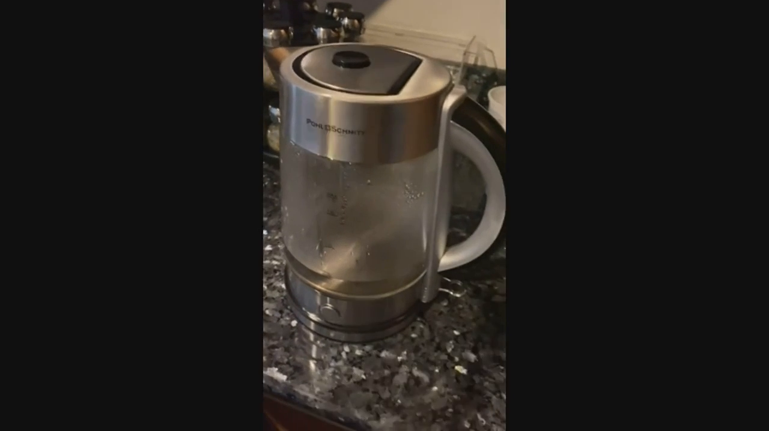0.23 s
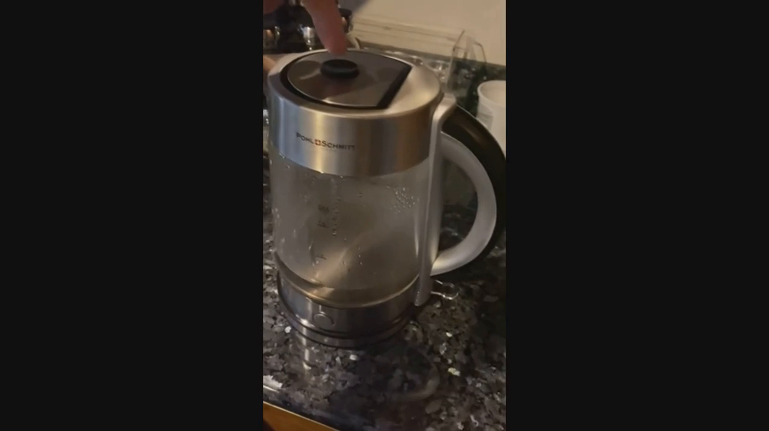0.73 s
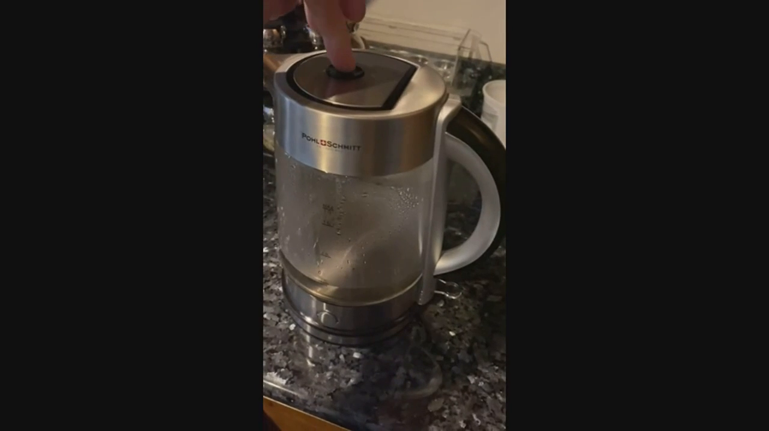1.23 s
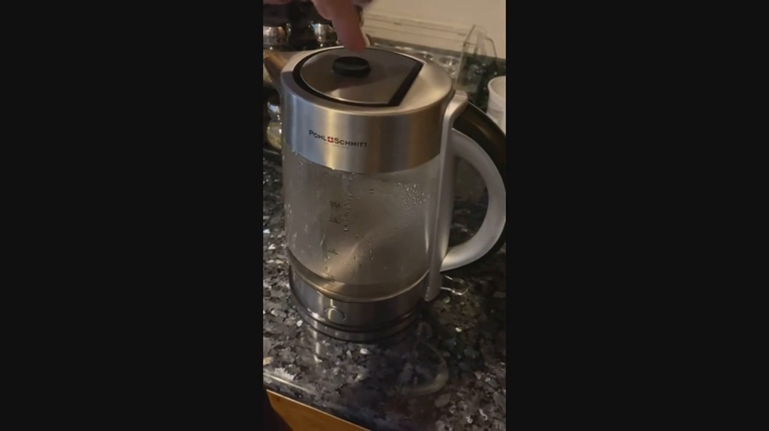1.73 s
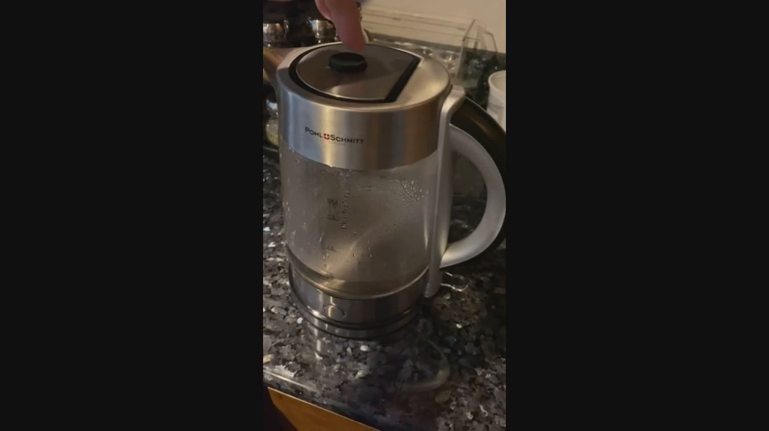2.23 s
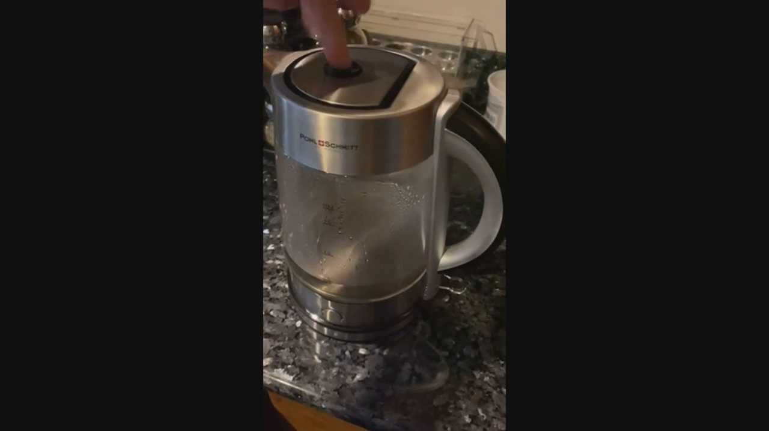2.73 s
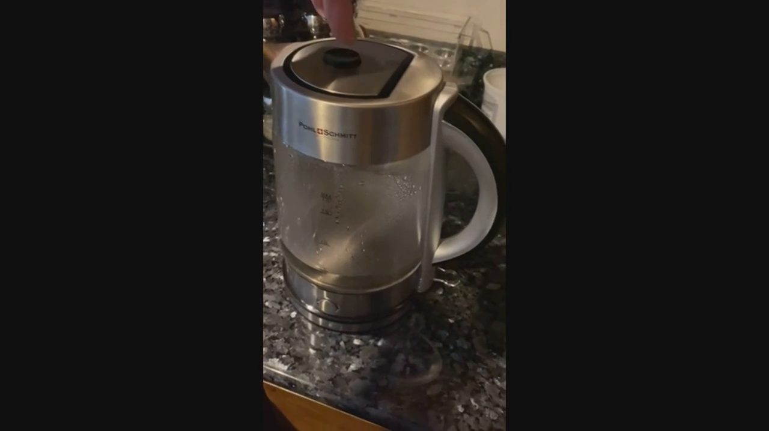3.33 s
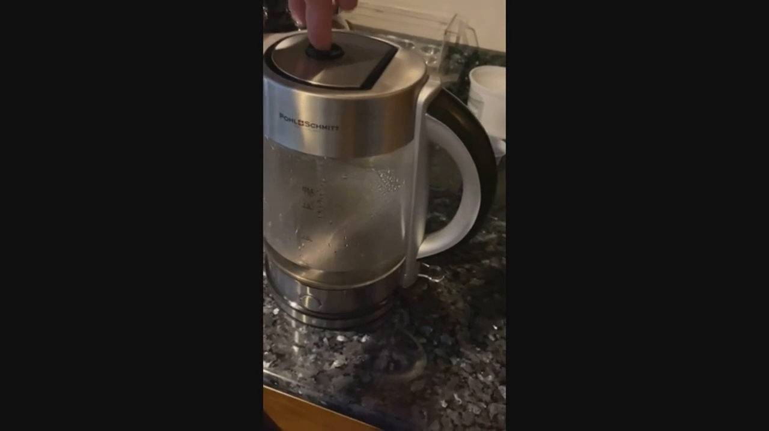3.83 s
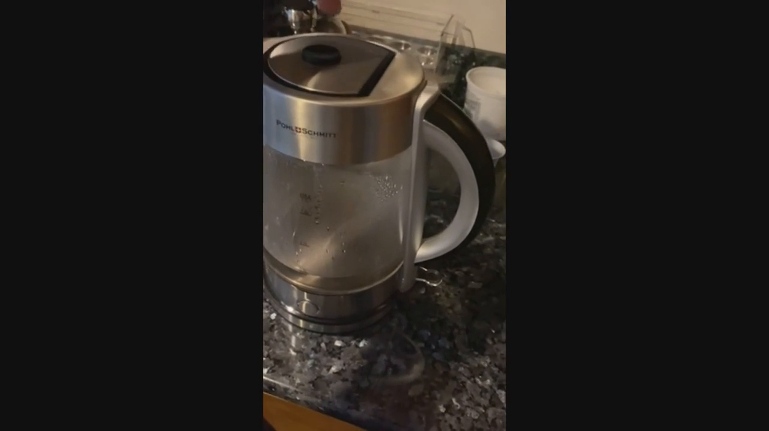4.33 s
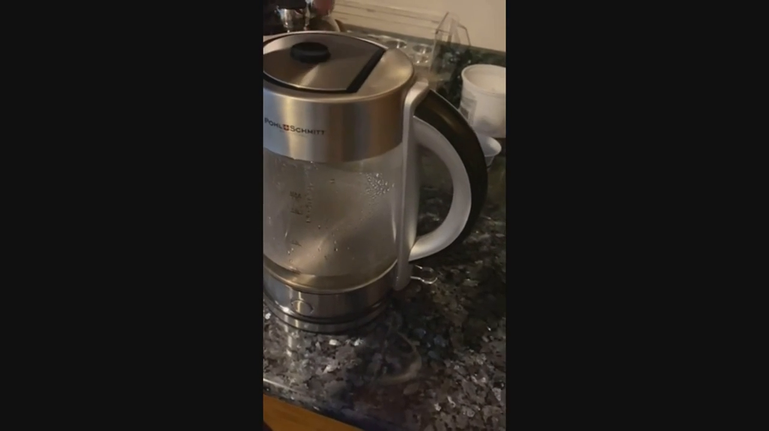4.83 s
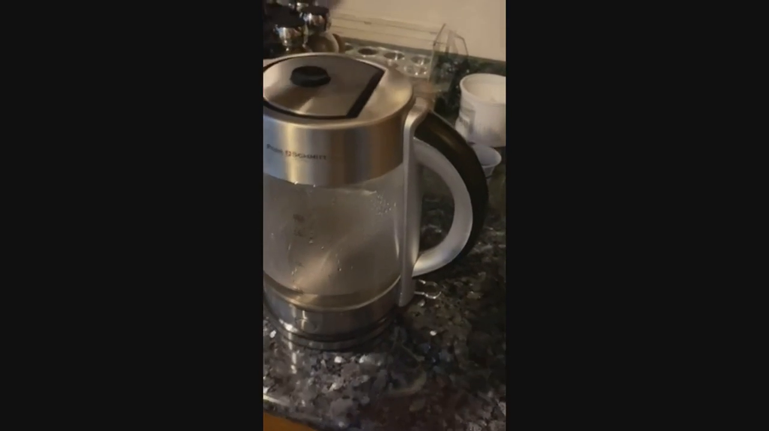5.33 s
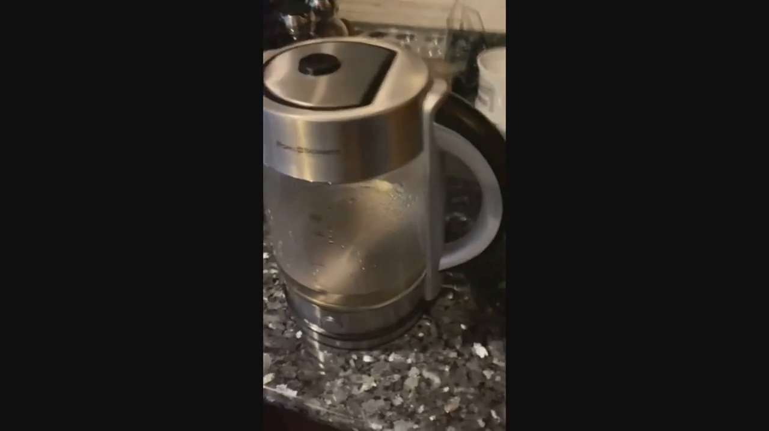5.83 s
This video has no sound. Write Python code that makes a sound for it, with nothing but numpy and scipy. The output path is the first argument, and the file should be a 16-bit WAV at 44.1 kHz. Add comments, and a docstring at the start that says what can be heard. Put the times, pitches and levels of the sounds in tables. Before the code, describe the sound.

A glass electric kettle rumbles low while a finger clicks its lid button four times, then dull thumps bump the microphone.

```python
"""A glass electric kettle rumbles low on a stone counter in a small kitchen, under faint hums and hiss.
Early on, a hand barely brushes the microphone and a fingertip taps the kettle's lid.
The finger then works the lid's button four times: the plastic catch scrapes and snaps, ringing
the lid and rocking the kettle, and the kitchen echoes. Near the end the hand shifts on the
microphone's housing, with a rustle of skin and dull thumps that sag in pitch."""
import sys
import numpy as np
from scipy import signal
from scipy.fft import rfft, irfft
from scipy.io import wavfile
from scipy.ndimage import uniform_filter1d

SR = 44100
rng = np.random.default_rng(int(sys.argv[2]) if len(sys.argv) > 2 else 0)


def waveform_to_disk(signal):
    """Save audio, clipped to [-1, 1], as 16-bit WAV at the path in sys.argv[1]."""
    frames = np.transpose(np.atleast_2d(signal))
    scaled = np.clip(frames, -1, 1) * 32767
    samples = np.round(scaled).astype(np.int16)
    wavfile.write(sys.argv[1], SR, samples)


N = 267642

# how alike the room sounds at the microphone's two ports: (frequency [Hz], likeness [-1 to 1])
ROOM_LIKENESS = [(60, 1), (140, 0.985), (300, 0.95), (640, 0.042), (1400, -0.051), (3100, -0.32)]
# fingers knock on the microphone's housing: (time [s], knock level [dB], skin scuff level [dB])
KNOCKS = [(.534, -57.5, -93), (3.405, -46, -95), (5.622, -41.5, -64.5), (5.829, -43, -56.5),
          (5.876, -46, -75), (5.915, -37, -51), (5.957, -40, -92), (6.0322, -24, -59)]


def amp(db):
    """Decibels to gain."""
    return 10 ** (np.asarray(db) / 20)


def unit_rms(x):
    """Scales to rms 1."""
    return x / np.sqrt(np.mean(x ** 2) + 1e-20)


def unit_energy(x):
    """Scales to energy 1."""
    return x / np.sqrt(np.sum(x ** 2) + 1e-20)


def read(points, hz):
    """Reads a table on a log-frequency axis."""
    f, value = np.transpose(points)
    return np.interp(np.log(hz + 1), np.log(f + 1), value)


def add(mix, s, sound):
    """Mixes a sound in at time s."""
    part = mix[max(round(s * SR), 0):][:len(sound)]
    part += sound[:len(part)]


def equalise(x, gain_db):
    """Minimum-phase EQ; gain_db is a function of frequency."""
    size = 2 * len(x)
    log_gain = np.log(amp(gain_db(abs(np.fft.fftfreq(size, 1 / SR)))))
    response = np.exp(np.conj(signal.hilbert(log_gain)))
    return np.fft.ifft(np.fft.fft(x, size) * response).real[:len(x)]


def noise(spectrum, likeness, patchy_db, size):
    """Stereo noise of rms 1 with patches that drift in time and frequency."""
    hz = np.fft.rfftfreq(size, 1 / SR)
    a, b, c, d, patches = rng.standard_normal((5, 4 * N // size + 5, len(hz)))
    patches = unit_rms(uniform_filter1d(uniform_filter1d(patches, size=7, axis=0), size=16, axis=1))
    like = np.clip(read(likeness, hz), -1, 1)
    left = a + 1j * b
    right = like * left + np.sqrt(1 - like ** 2) * (c + 1j * d)
    frames = np.array([left, right]) * amp(read(spectrum, hz) + patchy_db * patches)
    _, sound = signal.istft(frames.swapaxes(1, 2), nperseg=size, noverlap=size - size // 4)
    return unit_rms(sound[:, :N])


def wander(rate_hz):
    """Smooth random curve of rms 1."""
    hz = np.fft.rfftfreq(N, 1 / SR)
    return unit_rms(irfft(rfft(rng.standard_normal(N)) * np.exp(-(hz / rate_hz) ** 2), N))


def kettle_rumble():
    """The bed: the kettle's rumble and the hums swell together under a steadier wash and a thin hiss."""
    # the rumble's slow rise and fall: (time [s], level before a 1 dB lift [dB])
    swell = [(0.0, -61), (0.62, -57), (0.8, -52.5), (1.57, -51), (2.28, -58), (2.45, -50), (3.52, -56),
             (4.82, -52), (5.47, -54.5), (5.6, -53.5)]
    # spectra of the deep rumble, the midrange wash and the hiss: (frequency [Hz], relative level [dB])
    rumble_spectrum = [(20, -33), (34, -22), (50, -3.5), (64, 2.7), (90, 0), (135, -3.5), (165, -8),
                       (215, -4), (305, -6), (360, -13.5), (580, -25.5), (1500, -65)]
    wash_spectrum = [(150, -22.5), (300, -8.5), (400, 1), (580, -5.5), (1000, -12.5), (1500, -23.5),
                     (3000, -48.5)]
    hiss_spectrum = [(600, -1), (1500, 5), (2400, -1.5), (3400, 1), (4400, -1), (5200, -4), (7000, -7),
                     (11000, -12), (12500, -31), (16000, -38)]
    hiss_likeness = [(1000, -0.35), (8000, 0.086), (15000, -0.67)]  # (frequency [Hz], likeness [-1 to 1])
    swell_db = np.interp(np.arange(N) / SR, *np.transpose(swell))
    level = amp(swell_db + 1 + 0.03 * wander(rate_hz=23))
    low = level * noise(rumble_spectrum, ROOM_LIKENESS, patchy_db=3.0, size=4096)
    wash_level = amp(-66) * unit_rms(level ** 0.29)  # follows only part of the swell
    wash = wash_level * noise(wash_spectrum, ROOM_LIKENESS, patchy_db=1.5, size=1024)
    hiss = amp(-82) * noise(hiss_spectrum, hiss_likeness, patchy_db=3.5, size=1024)
    return low + wash + hiss + hums() * unit_rms(level)


def hums():
    """Two low hums and two faint whines, wavering in strength and phase."""
    # narrow tones: (pitch [Hz], level [dB], width [Hz], lag of the left port [rad])
    tones = [(64.5, -63.5, 11, 0.15), (205, -63, 4.8, 0.13), (2450, -94, 27, 2.27), (10040, -100, 31, 2.3)]
    t, out = np.arange(N) / SR, np.zeros((2, N))
    for hz, db, width_hz, lag in tones:
        waver = wander(width_hz) + 1j * wander(width_hz)
        tone = amp(db) * waver * np.exp(2j * np.pi * hz * t)
        out += np.real([tone * np.exp(-1j * lag), tone])
    return out


def hand_rustle():
    """A sliding hand rustles over the ports and rubs the housing in small jerks; each knock scuffs."""
    # the hand slides on the microphone: (start [s], end [s], rustle level [dB], rub level [dB])
    slides = [(0.085, 0.273, -80, -83), (5.477, 5.534, -79, -90), (5.608, 5.823, -68.5, -72),
              (5.836, 6.05, -67, -53.5)]
    # spectra of skin on the ports and of the rub through the housing: (frequency [Hz], relative level [dB])
    skin_spectrum = [(300, -8), (1100, 8.5), (1550, 6), (2700, 3.5), (4200, 2.5), (5500, 2.5), (6800, -1),
                     (9700, -1.5), (13000, 2), (16000, -10.5)]
    rub_spectrum = [(100, -6.5), (420, 9.5), (570, 4), (770, -0.5), (950, -18), (1500, -51), (4000, -60)]
    # how alike each is at the two ports: (frequency [Hz], likeness [-1 to 1])
    skin_likeness = [(1000, 0.3), (5000, -0.1), (9000, 0.3), (13000, -1.04)]
    rub_likeness = [(200, 0.96), (600, 0.99), (2000, 0.33)]
    attack_s, release_s, scuff_s = 0.0074, 0.032, 0.0013
    t, rustle_level, rub_level = np.arange(N) / SR, np.zeros(N), np.zeros(N)
    for start, end, rustle_db, rub_db in slides:
        moving = np.clip((t - start) / attack_s, 0, 1) * np.exp(-np.maximum(t - end, 0) / release_s)
        rustle_level += amp(rustle_db) * moving
        rub_level += amp(rub_db) * moving
    age = t[:SR // 6] / scuff_s
    for s, _, scuff_db in KNOCKS:
        add(rustle_level, s, amp(scuff_db) * age * np.exp(1 - age))
    rustle = noise(skin_spectrum, skin_likeness, patchy_db=1.2, size=512) * amp(2 * wander(rate_hz=78))
    rub = amp(3.7 * wander(rate_hz=93)) * noise(rub_spectrum, rub_likeness, patchy_db=3.5, size=1024)
    return rustle_level * rustle + rub_level * rub


def sizzle():
    """Faint narrow bands of hiss swell and fade, unrelated at the two ports; one is the button's spring ringing
    on after a press."""
    # swells of hiss, the one at 4.68 s the button's steel spring ringing on after the press: (time [s], level
    # [dB], band centre [Hz])
    swells = [(.48, -85, 4080), (2.6, -80.5, 3890), (3.18, -78.5, 3470), (3.35, -81, 4040),
              (4.14, -80.5, 3610), (4.33, -82.5, 4020), (4.68, -75.5, 4100), (5.36, -87, 3970),
              (5.52, -80.5, 3580)]
    half_length_s, width_hz = 0.097, 570
    t = np.arange(N) / SR
    band = np.array([wander(width_hz) + 1j * wander(width_hz) for port in range(2)])
    carriers = sum(amp(db) * np.exp(-((t - s) / half_length_s) ** 2 + 2j * np.pi * hz * t)
                   for s, db, hz in swells)
    return (band * carriers).real


def thud(db, first_hz, last_hz, swell_s):
    """A soft blow: a few cycles that swell, sag in pitch as the contact relaxes, and die."""
    age = np.arange(SR // 6) / SR / swell_s
    hz = last_hz + (first_hz - last_hz) * np.exp(-age / 0.79)
    envelope = (age * np.exp(1 - age)) ** 1.12
    return amp(db) * envelope * np.sin(2 * np.pi * np.cumsum(hz) / SR)


def housing_bumps():
    """Fingers and palm bump the microphone; its housing flexes, so the left port gets them late."""
    # the palm's thumps: (time [s], level [dB], first pitch [Hz], last pitch [Hz])
    thumps = [(5.631, -27, 95, 48), (5.830, -36, 440, 159), (5.892, -38, 101, 80), (5.918, -21, 235, 53.7),
              (6.044, -35.5, 168, 81)]
    flex_lag = [(60, 0.19), (200, 0.3), (600, 0.64)]  # (frequency [Hz], lag [rad])
    swell_cycles = 0.57
    bumps = np.zeros(N)
    for s, db, _ in KNOCKS:
        add(bumps, s, thud(db, first_hz=669, last_hz=571, swell_s=0.0027))
    for s, db, first_hz, last_hz in thumps:
        add(bumps, s, thud(db, first_hz, last_hz, swell_s=swell_cycles / last_hz))
    lag = read(flex_lag, np.fft.rfftfreq(N, 1 / SR))
    left = irfft(rfft(bumps) * np.exp(-1j * lag), N)
    return np.array([left, bumps])


def lid_click(db, tilt_db, focus_hz, scrape_s):
    """A snap and a short scrape ring the lid; the contact point favours the modes near focus_hz."""
    # modes of the lid and its steel collar: (pitch [Hz], relative level [dB], t60 [s])
    modes = [(676, -32, 0.029), (846, -7.5, 0.044), (877, 1, 0.05), (1020, 3, 0.03), (1092, 0, 0.04),
             (1245, -1.5, 0.041), (1307, -1, 0.057), (1382, -14.5, 0.22), (1780, -15.5, 0.043),
             (2034, -4.5, 0.051), (2145, -8, 0.08), (2350, -1.5, 0.02), (2510, 2, 0.014),
             (2920, -7.5, 0.052), (3390, -18, 0.04), (3940, -14, 0.045), (4120, -16.5, 0.053),
             (5120, -11, .035), (5400, -20.5, 0.04), (6380, -13.5, 0.035), (6650, -13, 0.06)]
    # spectrum of the plastic catch's crack: (frequency [Hz], relative level [dB])
    crack_spectrum = [(100, -31.5), (400, -3.5), (700, -0.5), (1000, 5), (1360, -11), (1500, -6.5),
                      (2300, -2.5), (3100, -7), (4200, -9.5), (6500, -14.5), (8000, -20.5), (10500, -20),
                      (13000, -33.5), (16000, -47.5)]
    crack_t60, slips_per_s, focus_db, focus_octaves = 0.09, 2000, 5, 0.19
    t = np.arange(SR // 4) / SR
    ring = np.zeros(len(t))
    for hz, mode_db, t60 in modes:
        decay = amp(mode_db + rng.normal(0, 0.68) - 60 * t / t60)
        ring += decay * np.sin(2 * np.pi * hz * rng.normal(1, 0.0058) * t) * rng.choice([-1, 1])
    grit = rng.standard_normal(len(t)) * (amp(-60 * t / crack_t60) + 1.73 * np.exp(-t / 0.0012))
    crack = equalise(grit, lambda hz: read(crack_spectrum, hz))
    age = t / scrape_s
    slips = rng.standard_normal(len(t)) * (rng.random(len(t)) < slips_per_s / SR)
    slips *= 0.37 * age * np.exp(1 - age)
    slips[0] = 1  # the first contact
    sound = signal.fftconvolve(unit_energy(ring) + unit_energy(crack), slips)[:len(t)]
    sound = equalise(sound, lambda hz: tilt_db * np.log2(np.clip(hz, 700, 12000) / 1500)
                     + focus_db * np.exp(-(np.log2((hz + 1) / focus_hz) / focus_octaves) ** 2))
    return amp(db) * unit_energy(sound) * np.sqrt(0.0038 * SR)  # the energy of 3.8 ms at this level


def fingertip():
    """A fingertip lightly taps and brushes the lid."""
    # touches: (time [s], level [dB], tilt [dB/octave], scrape length [s])
    touches = [(0.788, -73, 2.5, .016), (1.096, -56, -10, .0012), (1.13, -66, 3.5, 0.0024),
               (1.203, -52, -3.5, 0.0018), (1.244, -57, -6.5, 0.0063), (1.341, -60.5, -0.5, 0.0032),
               (2.25, -62.5, 0.5, 0.034), (2.54, -59, -6, 0.0075), (4.647, -55.5, -3, 0.0033)]
    out = np.zeros(N)
    for s, db, tilt_db, scrape_s in touches:
        add(out, s, lid_click(db, tilt_db, focus_hz=1310, scrape_s=scrape_s))
    return out


def button():
    """The button scrapes down and bottoms out, then unlatches, snaps and bounces, rocking the kettle."""
    # the finger pushes down: (time [s], travel [s], scrape level [dB], scrape length [s],
    # click level [dB], tilt [dB/octave], focus [Hz], thud level [dB], thud pitch [Hz])
    presses = [(1.57, 0.0078, -51, 0.0095, -40.5, 4.5, 6440, -39.5, 286),
               (2.775, .008, -48, 0.01, -55, 2, 4830, -39.5, 198),
               (3.768, .014, -45, 0.0021, -44, -1.5, 2400, -36.5, 217),
               (4.573, 0.011, -44.5, 0.0035, -38.5, 0.5, 2310, -33, 230)]
    # the button springs back: (time [s], travel [s], snap level [dB], tilt [dB/octave], focus [Hz],
    # bounce [dB re the snap])
    releases = [(1.6162, 0.0056, -29, 0.1, 1120, -12.5), (2.7941, 0.0031, -29, -0.7, 1280, -5.5),
                (3.9178, .0024, -32.5, -0.15, 1260, -23), (4.8027, .011, -32, -1, 1224, -20)]
    unlatch_db, recoil_db = -3, -9  # re the snap
    bounce_s, recoil_hz = 0.0053, 229.4
    sharp_ratio, swell_s, lead_s = 1.406, 0.0058, 0.00047  # a thud starts sharp, just before its click
    out = np.zeros(N)
    for s, travel_s, scrape_db, scrape_s, click_db, tilt_db, focus_hz, thud_db, thud_hz in presses:
        add(out, s, lid_click(scrape_db, tilt_db, focus_hz, scrape_s))
        add(out, s + travel_s, lid_click(click_db, tilt_db, focus_hz, scrape_s=0.0012))
        add(out, s + travel_s - lead_s, thud(thud_db, sharp_ratio * thud_hz, thud_hz, swell_s))
    for s, travel_s, db, tilt_db, focus_hz, bounce_db in releases:
        for delay_s, step_db in [(0, unlatch_db), (travel_s, 0), (travel_s + bounce_s, bounce_db)]:
            add(out, s + delay_s, lid_click(db + step_db, tilt_db, focus_hz, scrape_s=0.00032))
        add(out, s + travel_s - lead_s, thud(db + recoil_db, sharp_ratio * recoil_hz, recoil_hz, swell_s))
    return out


def kitchen_echo(x):
    """Sparse reflections of random sign, each band dying at its own speed."""
    # the kitchen's decay: (frequency [Hz], t60 [s])
    decay = [(200, 0.4), (600, 0.23), (1000, 0.94), (1350, 1), (1600, 0.91), (2800, 0.56), (6000, 0.61),
             (12000, 0.15)]
    # the colour of its echo: (frequency [Hz], relative level [dB])
    colour = [(200, 7.5), (500, 4.5), (720, 3), (1000, -2), (1380, -1), (1550, 1), (2200, -6), (3000, 3),
              (6000, -2.5), (12000, -3.5)]
    echoes_per_s, build_s = 4000, 0.016
    taps = rng.choice([-1, 1], (2, SR)) * (rng.random((2, SR)) < echoes_per_s / SR)
    hz, t, (left, unrelated) = signal.stft(taps, SR, nperseg=256)
    like = np.clip(read(ROOM_LIKENESS, hz), -1, 1)[:, None]
    right = like * left + np.sqrt(1 - like ** 2) * unrelated
    fade = amp(read(colour, hz)[:, None] - 60 * t / read(decay, hz)[:, None])
    tail = signal.istft(np.array([left, right]) * fade, SR, nperseg=256)[1][:, :SR]
    tail *= 1 - np.exp(-(np.arange(SR) / SR / build_s) ** 2)  # the walls answer a moment later
    return signal.fftconvolve(x[None], np.sqrt(2) * unit_energy(tail), axes=1)[:, :N]


def from_lid(sound):
    """Sound from the lid reaches the two ports out of step and rings in the kitchen."""
    # how far the left port leads: (frequency [Hz], phase [rad])
    left_lead = [(100, -0.31), (250, -0.17), (700, 0.74), (1350, 0.42), (1700, 0.82), (2300, 1.4),
                 (2700, 2.3), (3450, 1.17), (4400, 1.77), (5400, 1.4), (6500, 1.15), (8500, 1.33),
                 (11000, 2.35)]
    lead = read(left_lead, np.fft.rfftfreq(N, 1 / SR))
    left = irfft(rfft(sound) * np.exp(1j * lead), N)
    direct = np.array([amp(0.3) * left, amp(1.13) * sound])
    return direct + amp(-18.5) * kitchen_echo(sound)


def scene():
    """The kettle's bed, the finger on its lid and the hand on the microphone, in stereo."""
    return kettle_rumble() + sizzle() + from_lid(button() + fingertip()) + hand_rustle() + housing_bumps()


def record(dry):
    """A steep low-pass takes off the very top."""
    low_pass = signal.firwin(511, cutoff=16100, window=("kaiser", 9), fs=SR)
    return signal.oaconvolve(dry, low_pass[None], "same")


dry = scene()
out = record(dry)
waveform_to_disk(out)
```